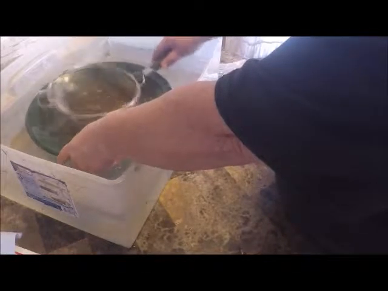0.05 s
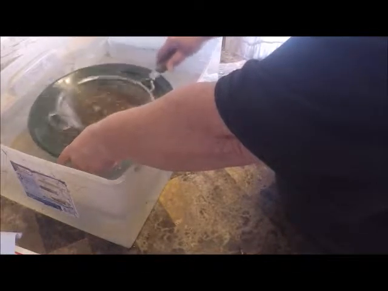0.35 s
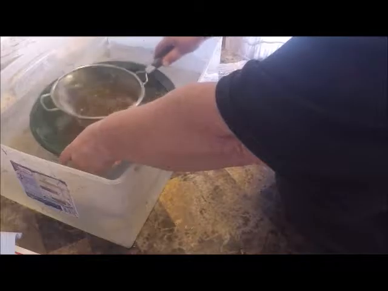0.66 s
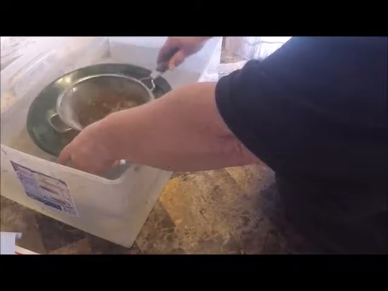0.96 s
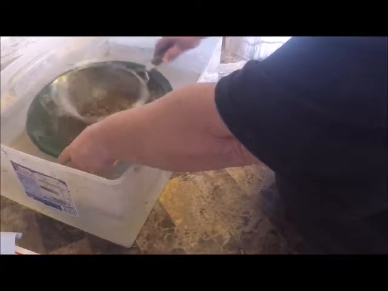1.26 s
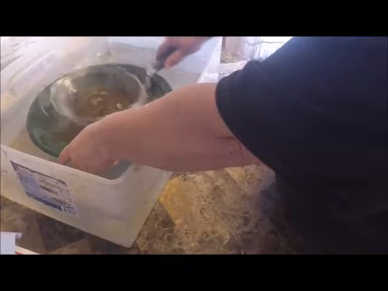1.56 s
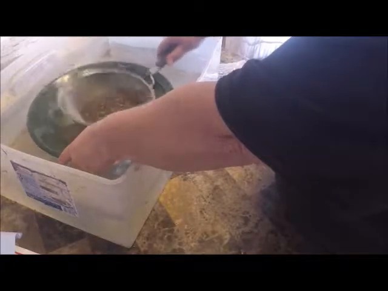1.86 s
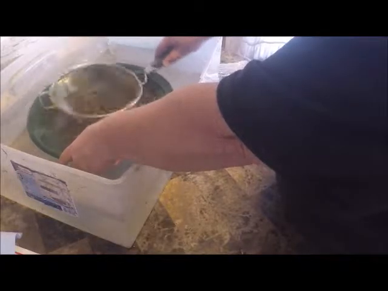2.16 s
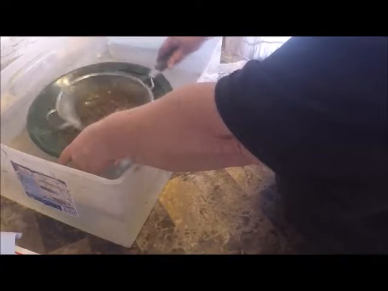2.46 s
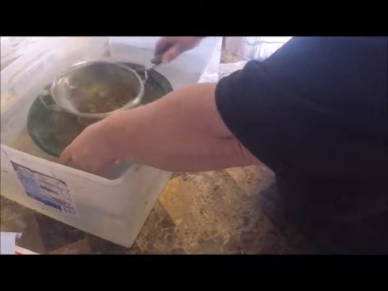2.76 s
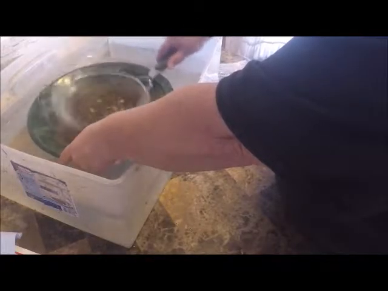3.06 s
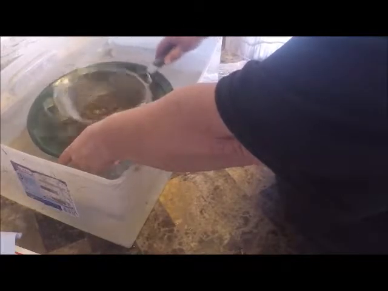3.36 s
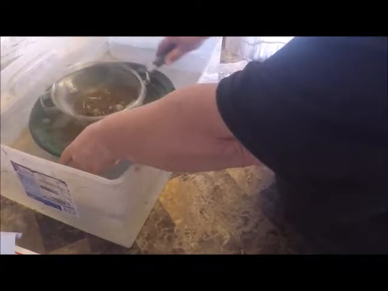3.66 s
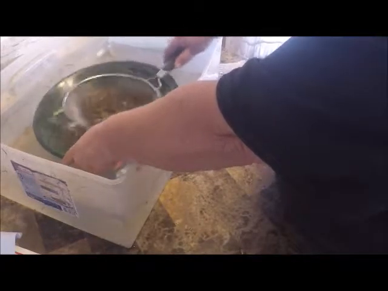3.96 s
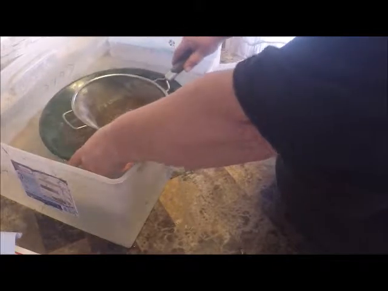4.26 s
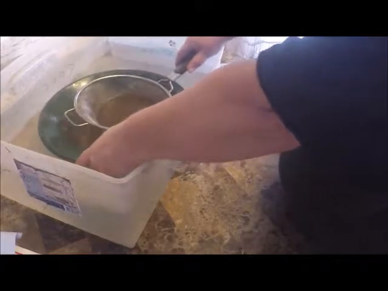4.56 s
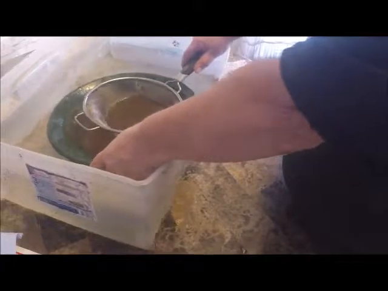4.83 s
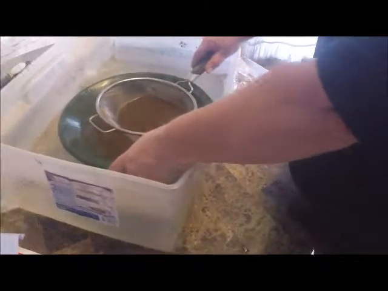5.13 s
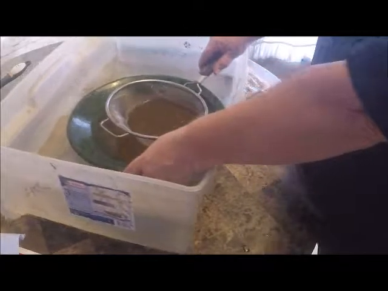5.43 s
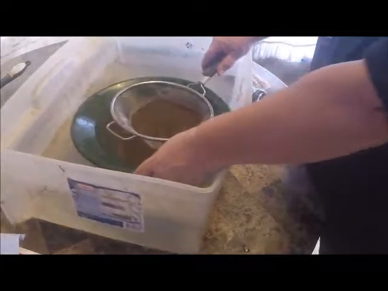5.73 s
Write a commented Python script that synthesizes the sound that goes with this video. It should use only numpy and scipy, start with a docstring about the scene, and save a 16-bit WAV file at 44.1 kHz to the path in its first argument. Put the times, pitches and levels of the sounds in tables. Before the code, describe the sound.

Close up in a small room, wet grit swishes over metal mesh in a fast, even rhythm, with hollow rubbing from a plastic pan and a few clicks of larger stones. The sieving runs out about two thirds of the way through. A cushioned thud follows, then a short shove and a longer shuddering scrape of plastic on plastic, over a deep rumble and faint hum.

```python
"""A small room, one microphone close to a plastic pan of water that sits in a plastic tub.
Wet gravel is shaken to and fro in a wire strainer in the pan: each stroke slides the grit over the mesh
with a swish and jostles the pan, and now and then larger stones click. The shaking stops, the pan bumps,
a stone clicks, and the plastic sticks and slips with a dull scrape as it is pushed aside.
A deep rumble, a low hum and the air of the room lie underneath."""
import sys
import numpy as np
from scipy import signal
from scipy.fft import rfft, irfft
from scipy.io import wavfile

SR = 44100
rng = np.random.default_rng(int(sys.argv[2]) if len(sys.argv) > 2 else 0)


def pcm_store(signal):
    """Save signal as 16-bit PCM."""
    levels = np.round(np.clip(np.atleast_2d(signal), -1, 1) * 32767)
    wavfile.write(sys.argv[1], SR, levels.astype(np.int16).T)


N = 264159
TIME = np.arange(N) / SR


def gravel(outward, backward):
    """The load is thrown against one side of the strainer, then against the other."""
    out = swish(outward, coarse_db=1.0, fine_db=1.65, pebble_db=-11.5)
    back = swish(backward, coarse_db=0.94, fine_db=1.5, pebble_db=-13.0)
    return out + back


# grit on the wire mesh, heard close: frequency_hz, gain_db
MESH_SPECTRUM = [(530, -39.5), (900, -14.5), (943, -18.5), (1090, -15.5), (1210, -17), (1800, -9),
                 (1960, -9.5), (2820, 0), (3400, -6.5), (4960, -2.5), (7760, -9), (8730, -13.5),
                 (11400, -15.5), (13200, -13), (15000, -16)]

def swish(strokes, coarse_db, fine_db, pebble_db):
    """Coarse sand starts to roll first; the finer, brighter grit and the pebbles follow over the mesh."""
    split_hz = 3300
    coarse = butter(grains(per_s=5000, spread_db=2.5), 4, split_hz, "low")
    fine = butter(grains(per_s=12000, spread_db=1), 4, split_hz, "high")
    # the wet load moves in clumps
    coarse *= from_db(1.1 * drift(per_s=50))
    fine *= from_db(.6 * drift(per_s=60))
    early = from_db(coarse_db) * coarse * slide(strokes, lag_s=-0.01)
    bright = from_db(fine_db) * fine + from_db(pebble_db) * pebbles(per_s=450)
    late = bright * slide(strokes, lag_s=0.0013)
    return room(colour(early + late, MESH_SPECTRUM), wet_db=-10.5)


def pebbles(per_s, sizes=10):
    """Random knocks of small pebbles, each size with its own pitch; rms 1."""
    out = np.zeros(N)
    for hz in np.geomspace(1800, 8000, sizes):
        contacts = grains(per_s / sizes, spread_db=1.5)
        out += signal.oaconvolve(contacts, hz * clack(hz, cycles=2.2))[:N]
    return rms_one(out)


# the last swing over the pan runs out gently: peak_s, level_db, half_length_s
LAST_STROKE = [(4.158, -56, 0.057)]

def shaking():
    """The arm swings the strainer out and back: a list of strokes for each direction."""
    outward = arm_strokes(first_cycle=0, lag_s=0, half_s=0.029) + LAST_STROKE
    backward = arm_strokes(first_cycle=-1, lag_s=0.095, half_s=0.0302)
    return outward, backward


def arm_strokes(first_cycle, lag_s, half_s):
    """One stroke a cycle, slowing a little and growing a little harder: peak_s, level_db, half_length_s."""
    first_out_s, cycle_s, slowing_s_per_cycle = 0.1052, 0.21009, 0.00018
    base_db, rise_db_per_s, scatter_db = -50, 0.39, 0.5
    cycle = np.arange(first_cycle, 19)
    peak_s = first_out_s + lag_s + cycle * (cycle_s + slowing_s_per_cycle * (cycle + 1) / 2)
    level_db = base_db + rise_db_per_s * peak_s + scatter_db * rng.standard_normal(len(cycle))
    return [(s, db, half_s) for s, db in zip(peak_s, level_db)]


# resonances of the pan and the tub around it: pitch_hz, width_hz, gain_db
PAN_RESONANCES = [(145, 10, -20), (255, 42, -7), (336.5, 39, -1.5), (417, 30, 2.5), (484, 57, -6),
                  (617, 180, -14), (857, 40, -10.5), (1090, 43, -17), (1324, 33, -17.5)]

def jostled_pan(outward, backward):
    """The strainer rubs the pan, harder and later on the way back; sloshing water bends its ring."""
    pitch_bend, slosh_per_s = 0.01507, 7
    out = from_db(-10.0) * slide(outward, lag_s=-0.009)
    back = from_db(-7.5) * slide(backward, lag_s=0.0017)
    ring = resonate(grains(per_s=1000, spread_db=1.66) * (out + back), PAN_RESONANCES)
    bent_time = TIME + pitch_bend / slosh_per_s * drift(slosh_per_s)
    return room(np.interp(bent_time, TIME, ring), wet_db=-6.5)


# larger stones knock on each other and on the wire: start_s, level_db, pitch_hz
STONE_KNOCKS = [(1.4645, -39, 5140), (1.469, -38.5, 4950), (1.475, -44, 4600), (2.9365, -53, 2750),
                (2.9445, -42, 5150), (2.9506, -45, 4550), (3.781, -43, 2960), (3.804, -45, 4800),
                (4.7958, -42.5, 3880), (5.194, -55, 3000)]
# a little grit trickles after the last loud stone: peak_s, level_db, half_length_s
GRIT_TRICKLE = [(4.819, -59.5, 0.025)]

def stones():
    """Single hard knocks; each shakes the wet grit around it, which settles with a dull rustle."""
    knocks = np.zeros(N)
    for start_s, level_db, hz in STONE_KNOCKS:
        knock = from_db(level_db) * clack(hz, cycles=2.6)
        start = round(start_s * SR)
        knocks[start:start + len(knock)] += knock
    shaken = from_db(-18) * np.abs(knocks) * rng.standard_normal(N)
    trickle = grains(per_s=4400, spread_db=1) * slide(GRIT_TRICKLE)
    rustle = butter(colour(shaken + trickle, MESH_SPECTRUM), 2, 7000, "low")
    # the walls of the tub throw each knock back within a few hundredths of a second
    t = TIME[:SR // 10]
    walls = rng.standard_normal(len(t)) * decay(t, t60_s=.1) * (t > .003)
    return knocks + from_db(-2.0) * convolve(knocks, walls) + rustle


def clack(hz, cycles):
    """A wet stone rings for a few cycles, with a cushioned start; height 1."""
    t = TIME[:SR // 40]
    age = t * hz / cycles
    return age * np.exp(1 - age) * np.sin(2 * np.pi * hz * t)


# a short shove frees the plastic, a longer push slides it until it runs out:
# start_s, attack_s, hold_s, fade_db_per_s, shudder_db, rasp_drive_db
PLASTIC_PUSHES = [(4.619, 0.069, 0.041, 81, -51, -66.5), (4.839, 0.12, 0.237, 21, -56.5, -65.5)]
# resonances of the plastic while it is pressed and dragged: pitch_hz, width_hz, gain_db
PLASTIC_RESONANCES = [(143.4, 30, -6), (233.3, 46, -5), (325, 29, -3), (384, 42, -0.5), (474, 127, -8),
                      (640, 350, -22.5), (817, 26, -18.5), (1055, 44, -23)]
# grit rasping under the tub: frequency_hz, gain_db
RASP_SPECTRUM = [(350, -45), (600, -5), (1030, -7), (1580, -14), (2980, -10.5), (4290, -18), (4810, -9.5),
                 (8450, -31.5), (12000, -54), (15600, -46), (22000, -120)]
# the same grit rings as it is scraped: pitch_hz, width_hz, gain_db
GRIT_RESONANCES = [(2860, 93, -2), (4850, 190, -3)]
# the floor of the tub booms once: peak_s, level_db, half_length_s
FLOOR_BOOM = [(5.005, -53.5, 0.034)]

def dragged_plastic():
    """Plastic sticks and slips on plastic, with grit rasping in between."""
    bite_s = 0.019   # grit bites at once, before the shudder has built up
    shudder_gain = rasp_gain = 0
    for start_s, attack_s, hold_s, fade, shudder_db, rasp_db in PLASTIC_PUSHES:
        push = effort(start_s, attack_s, hold_s, fade)
        bite = effort(start_s, bite_s, attack_s + hold_s - bite_s, fade)
        shudder_gain = np.hypot(shudder_gain, from_db(shudder_db) * push)
        rasp_gain = np.hypot(rasp_gain, from_db(rasp_db) * bite)
    shudder = resonate(grains(per_s=1200, spread_db=1.2) * shudder_gain, PLASTIC_RESONANCES)
    grit = grains(per_s=3000, spread_db=2.5) * rasp_gain
    rasp = from_db(-1.0) * colour(grit, RASP_SPECTRUM) + from_db(-11) * resonate(grit, GRIT_RESONANCES)
    long_push = effort(*PLASTIC_PUSHES[-1][:4])
    groan = wall_groan(long_push)
    boom = slide(FLOOR_BOOM) * wavering_tone(hz=148.8, waver_hz=3.2)
    return room(shudder + rasp + groan + boom, wet_db=-10.0)


def wall_groan(push, pitch_hz=383, sag_hz=20):
    """The slips lock to a wall resonance and the plastic groans, lower as the push weakens."""
    gain = from_db(-56 + 2.4 * drift(per_s=76)) * push ** 1.25
    return gain * wavering_tone(pitch_hz - sag_hz * (1 - push), waver_hz=12.05)


def effort(start_s, attack_s, hold_s, fade_db_per_s):
    """A push builds up, holds and dies away; height 1."""
    age = TIME - start_s
    rise = np.sin(np.pi / 2 * np.clip(age / attack_s, 0, 1)) ** 2
    return rise * from_db(-fade_db_per_s * np.maximum(age - attack_s - hold_s, 0))


# the pan bumps the tub: start_s, strength_db
PAN_BUMPS = [(4.2505, -43), (4.2595, -42.5), (4.284, -48.5)]
# modes of the bumped plastic: pitch_hz, gain_db, t60_s
THUD_MODES = [(170, -23, 0.061), (287, -18, 0.038), (353, 2.5, 0.053), (416, -11, 0.081), (553, -21, 0.053),
              (790, -20, 0.052), (2200, -9, .012)]

def bumps():
    """Plastic meets plastic softly: each thud is a few decaying modes, its sharpest edge mostly filtered away."""
    thuds = np.zeros(N)
    for start_s, strength_db in PAN_BUMPS:
        age = TIME - start_s
        live = (age > 0) & (age < .5)
        t = age[live]
        for hz, mode_db, t60_s in THUD_MODES:
            gain = from_db(strength_db + mode_db + rng.normal())
            thuds[live] += gain * decay(t, t60_s) * np.sin(2 * np.pi * hz * t)
    cushioned = butter(thuds, 2, [180, 900], "band")
    return room(cushioned + from_db(-21) * thuds, wet_db=-6.0)


# reverberation of the small room: frequency_hz, t60_s
ROOM_DECAY = [(100, 0.23), (400, 0.52), (2500, 0.66), (6000, 0.72), (14000, 0.3)]

def room(x, wet_db):
    """The direct sound reaches the microphone first, then a diffuse tail that dies octave by octave."""
    t = TIME[:SR * 3 // 4]
    edges_hz = np.geomspace(70, 18000, 9)
    tail = 0
    for low, high in zip(edges_hz, edges_hz[1:]):
        band = butter(rng.standard_normal(len(t)), 2, [low, high], "band")
        tail += band * decay(t, at_hz(ROOM_DECAY, np.sqrt(low * high)))
    tail *= t > .004   # the nearest wall answers first
    return x + from_db(wet_db) * convolve(x, tail)


# deep rumble in the room: frequency_hz, gain_db
RUMBLE_SPECTRUM = [(12, -28), (22, 2), (33, 2.5), (48, -5), (75, -15), (105, -21), (140, -21.5),
                   (220, -53.5)]
# its rise and fall: time_s, relative_level_db
RUMBLE_CONTOUR = [(0.0, -55), (0.12, -53.5), (3.44, -57.5), (3.5, -53.5), (4.77, -56.5), (5.22, -50.5),
                  (5.29, -59.5), (5.99, -56)]
# a low hum swells as the shaking ends: time_s, level_db
HUM_CONTOUR = [(0, -69.5), (3.7, -73.5), (4.25, -56), (4.6, -58.5), (4.85, -64), (5.99, -66.5)]
# room air and hiss at the microphone: frequency_hz, gain_db
AIR_SPECTRUM = [(100, 7), (200, -4), (380, 0), (650, -13.5), (1500, -15.5), (2800, -16), (5000, -19),
                (7000, -25), (9500, -29.5), (15000, -38)]

def room_tone():
    """Deep rumble, a wavering hum and the air of the room."""
    rumble_gain = from_db(np.interp(TIME, *np.transpose(RUMBLE_CONTOUR)) + 1.23)
    rumble = rumble_gain * rms_one(colour(rng.standard_normal(N), RUMBLE_SPECTRUM))
    hum_gain = from_db(np.interp(TIME, *np.transpose(HUM_CONTOUR)))
    hum = hum_gain * wavering_tone(hz=74.4, waver_hz=3.92)
    air = butter(colour(rng.standard_normal(N), AIR_SPECTRUM), 2, 90, "high")
    return rumble + hum + from_db(-66) * rms_one(air)


def slide(strokes, lag_s=0):
    """Each movement speeds up and stops again: a bell of amplitude."""
    t = TIME[::32]
    power = sum(from_db(db) ** 2 * np.exp(-((t - s - lag_s) / half_s) ** 2) for s, db, half_s in strokes)
    return np.interp(TIME, t, np.sqrt(power))


def grains(per_s, spread_db):
    """Random contacts of uneven size; rms 1."""
    at = np.flatnonzero(rng.random(N) < per_s / SR)
    size_db = spread_db * np.minimum(rng.exponential(1, len(at)), 4)
    out = np.zeros(N)
    out[at] = from_db(size_db) * rng.choice([-1, 1], len(at))
    return rms_one(out)


def wavering_tone(hz, waver_hz):
    """A sine whose pitch wavers at random; rms 1."""
    return np.sqrt(2) * np.sin(2 * np.pi * np.cumsum(hz + waver_hz * drift(per_s=45)) / SR)


def drift(per_s):
    """A smooth random wander with spread 1."""
    knots = rng.standard_normal(N // 40)
    return np.interp(TIME * per_s, np.arange(len(knots)), knots) * np.sqrt(3 / 2)


def resonate(x, resonances):
    """Parallel resonances of a body, alternating in sign."""
    t = TIME[:SR // 4]
    response = 0
    for k, (hz, width_hz, db) in enumerate(resonances):
        envelope = from_db(db) * width_hz * np.exp(-np.pi * width_hz * t)
        response += (-1) ** k * envelope * np.sin(2 * np.pi * hz * t)
    return convolve(x, response)


def colour(x, spectrum, size=16384):
    """Causal (minimum-phase) filter with the given spectral shape."""
    gain = from_db(at_hz(spectrum, np.fft.rfftfreq(size, 1 / SR)))
    cepstrum = irfft(np.log(gain))
    cepstrum[1:size // 2] *= 2
    cepstrum[size // 2 + 1:] = 0
    return convolve(x, irfft(np.exp(rfft(cepstrum))))


def convolve(x, response):
    """Apply an impulse response, keeping the power of white noise."""
    return signal.oaconvolve(x, response / np.linalg.norm(response))[:N]


def butter(x, order, hz, kind):
    """Low-, high- or band-pass filter."""
    return signal.sosfilt(signal.butter(order, hz, kind, fs=SR, output="sos"), x)


def decay(t, t60_s):
    """Fall by 60 dB every t60_s."""
    return np.exp(-np.log(1000) * t / t60_s)


def at_hz(points, hz):
    """Read a table on a log-frequency axis."""
    table_hz, value = np.transpose(points)
    return np.interp(np.log(np.maximum(hz, 1)), np.log(table_hz), value)


def from_db(db):
    """Decibels to gain."""
    return 10 ** (np.asarray(db) / 20)


def rms_one(x):
    """Scale to unit rms."""
    return x / np.sqrt(np.mean(x ** 2) + 1e-30)


def scene():
    """Everything reaches one microphone, alike in both channels."""
    outward, backward = shaking()
    sieving = gravel(outward, backward) + stones() + jostled_pan(outward, backward)
    mono = sieving + dragged_plastic() + bumps() + room_tone()
    return np.array([mono, mono])


def record(dry):
    """The highest treble is cut steeply."""
    cutoff_hz = 15350
    return signal.sosfilt(signal.ellip(12, .1, 80, cutoff_hz, fs=SR, output="sos"), dry)


dry = scene()
out = record(dry)
pcm_store(out)
```